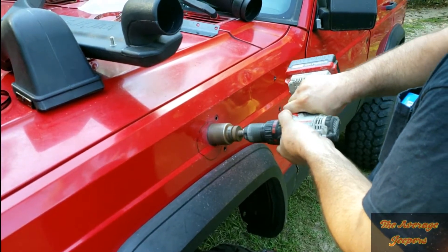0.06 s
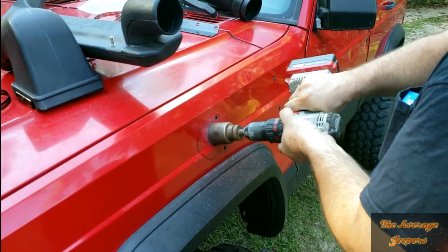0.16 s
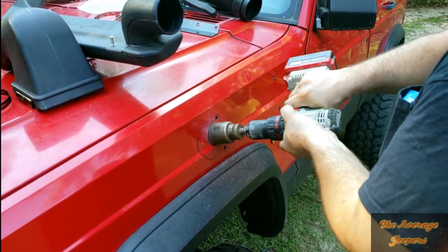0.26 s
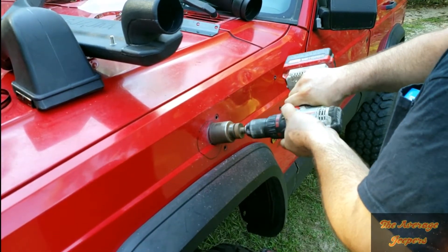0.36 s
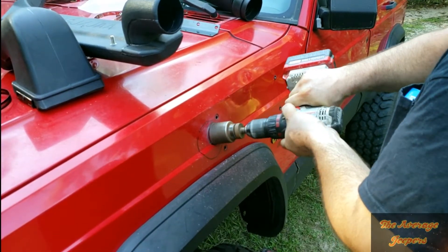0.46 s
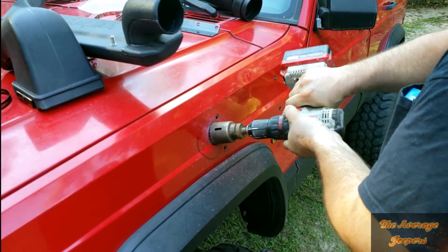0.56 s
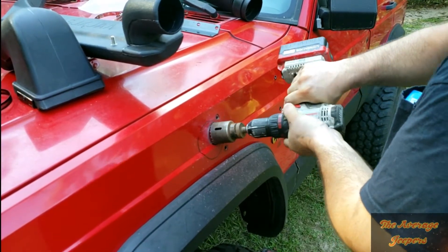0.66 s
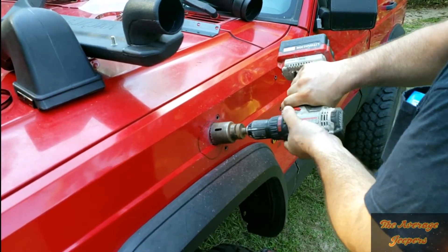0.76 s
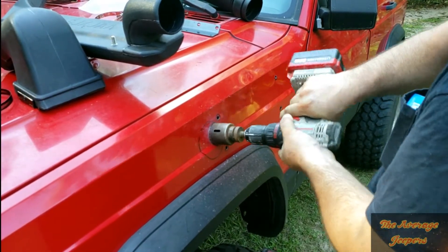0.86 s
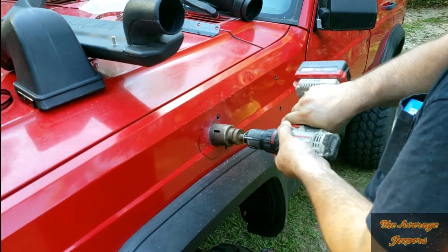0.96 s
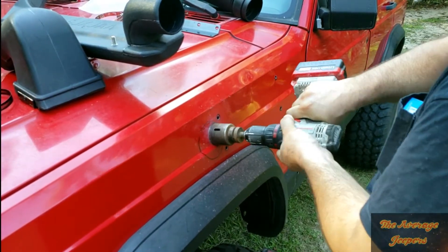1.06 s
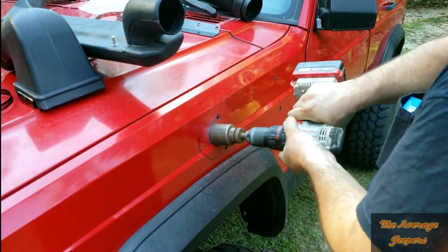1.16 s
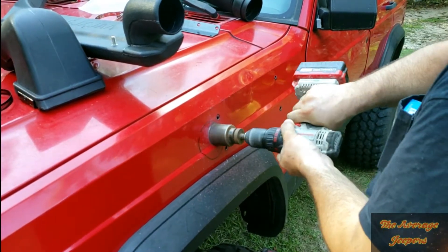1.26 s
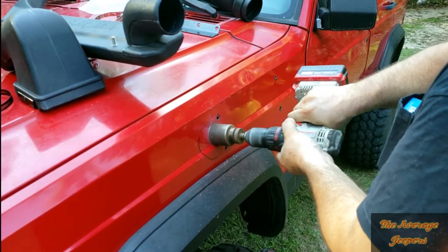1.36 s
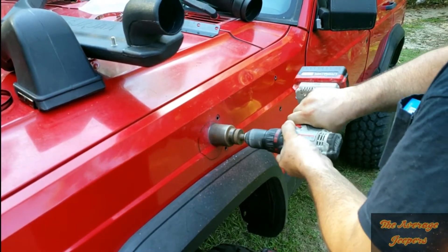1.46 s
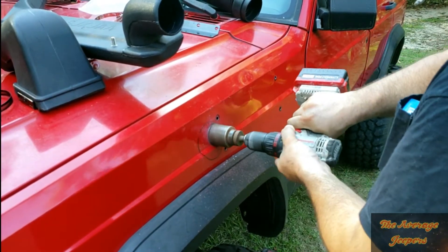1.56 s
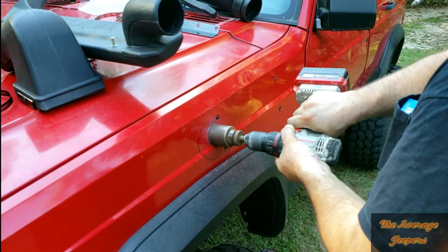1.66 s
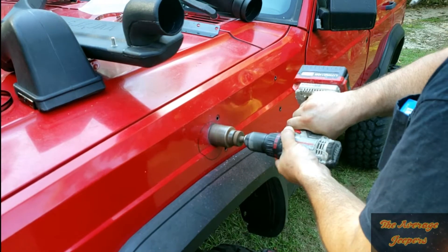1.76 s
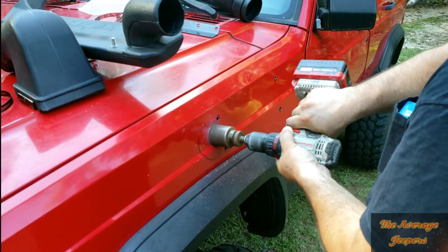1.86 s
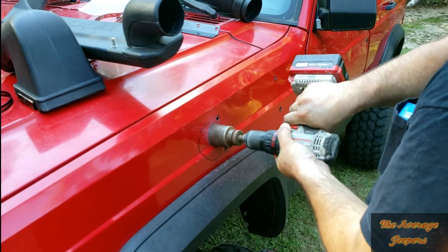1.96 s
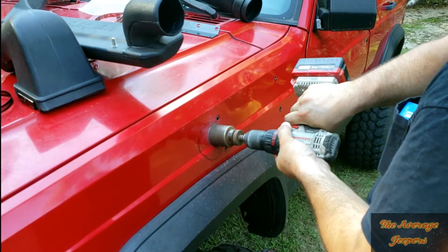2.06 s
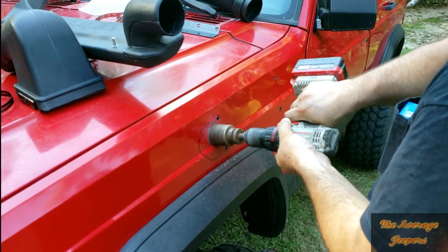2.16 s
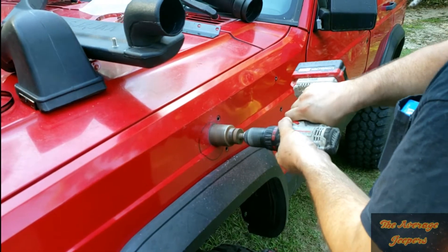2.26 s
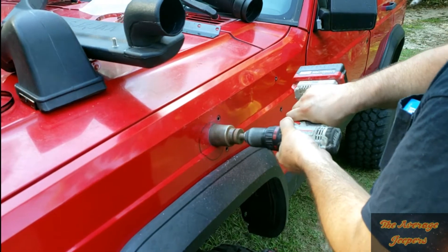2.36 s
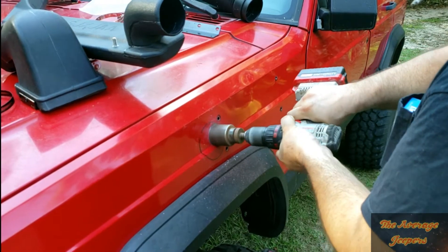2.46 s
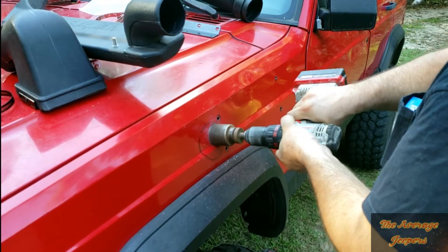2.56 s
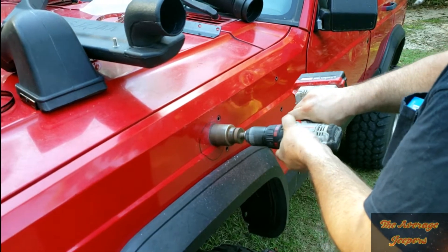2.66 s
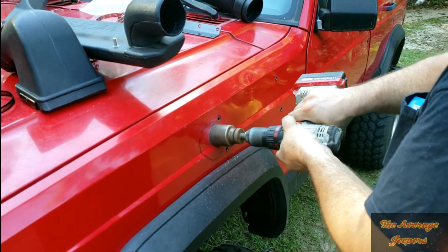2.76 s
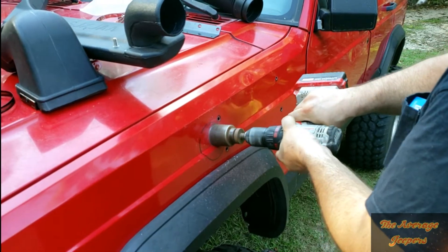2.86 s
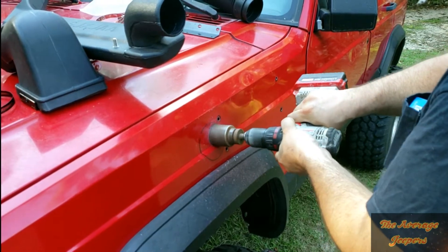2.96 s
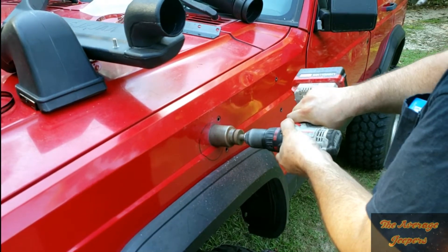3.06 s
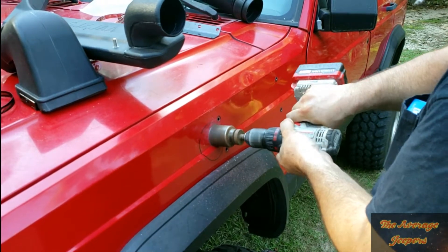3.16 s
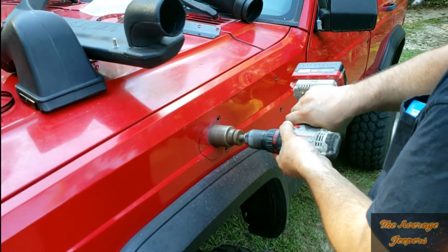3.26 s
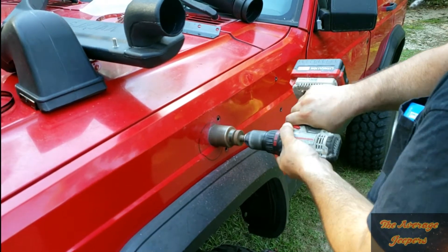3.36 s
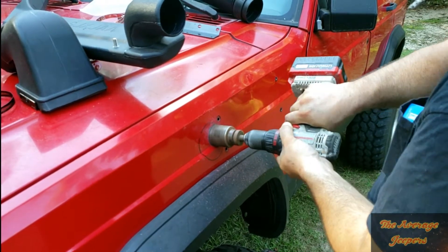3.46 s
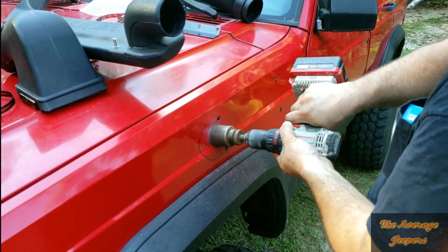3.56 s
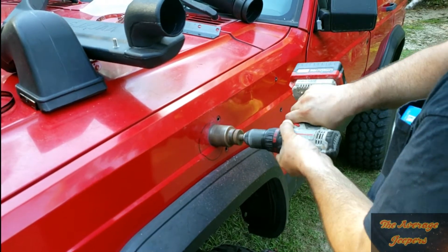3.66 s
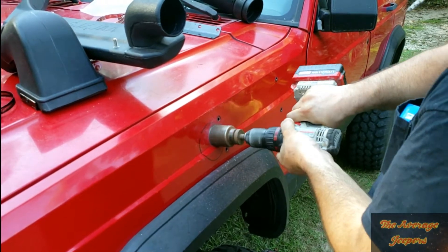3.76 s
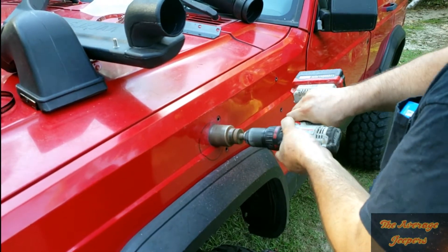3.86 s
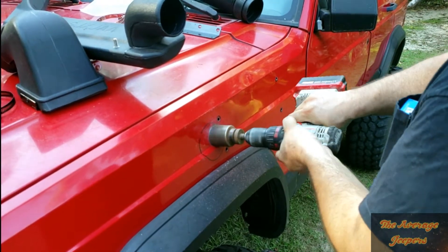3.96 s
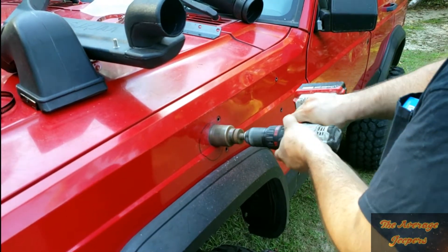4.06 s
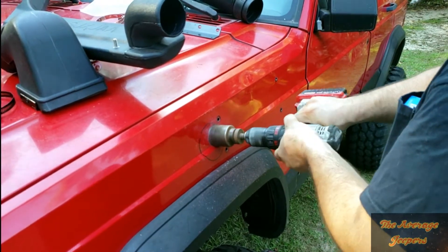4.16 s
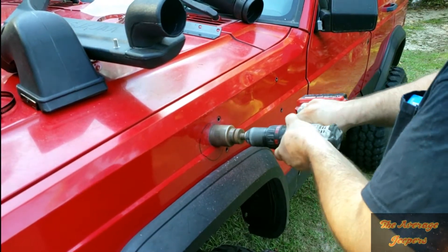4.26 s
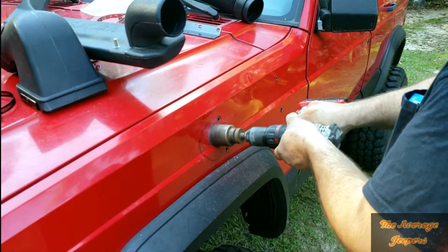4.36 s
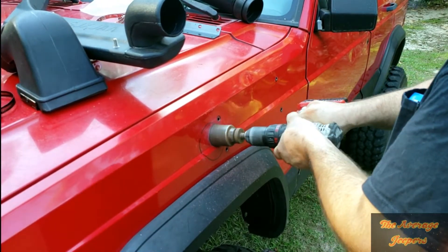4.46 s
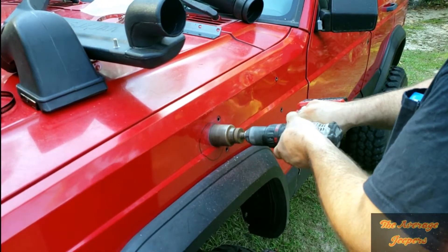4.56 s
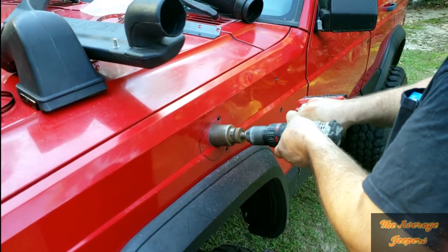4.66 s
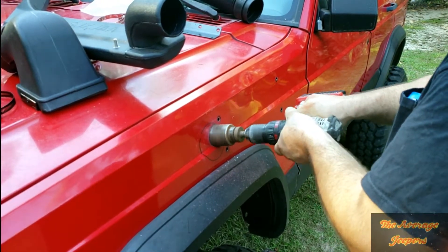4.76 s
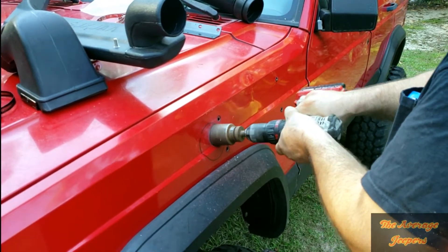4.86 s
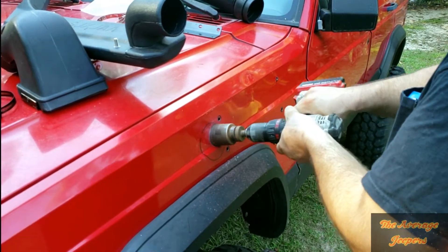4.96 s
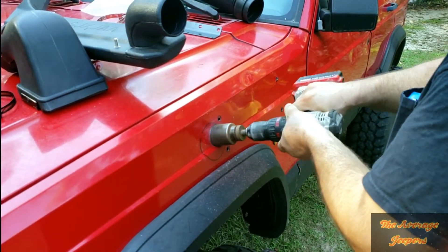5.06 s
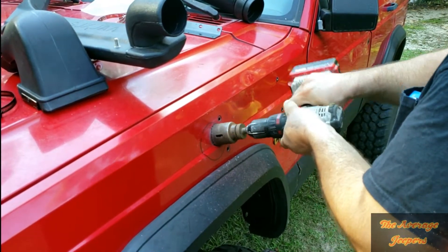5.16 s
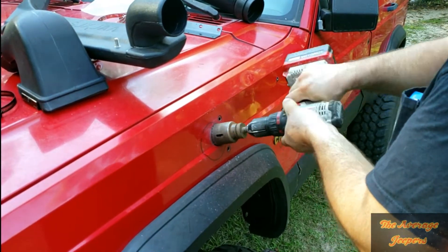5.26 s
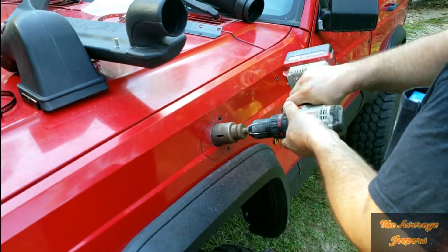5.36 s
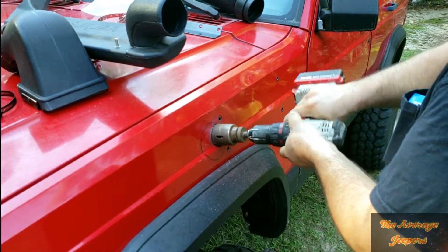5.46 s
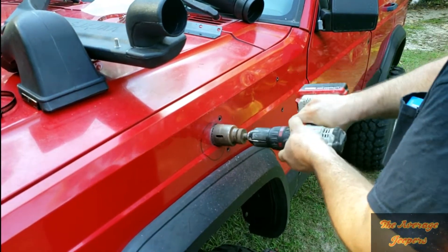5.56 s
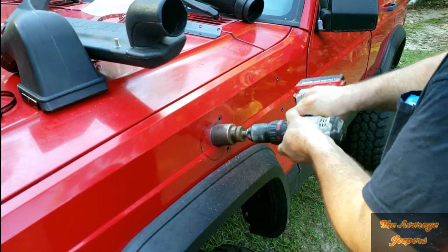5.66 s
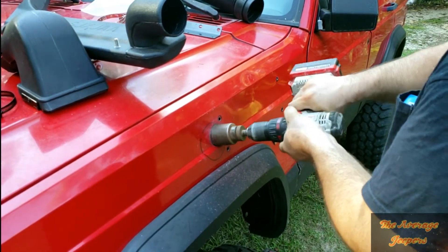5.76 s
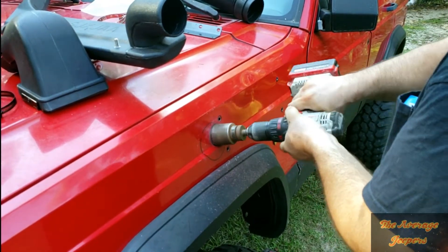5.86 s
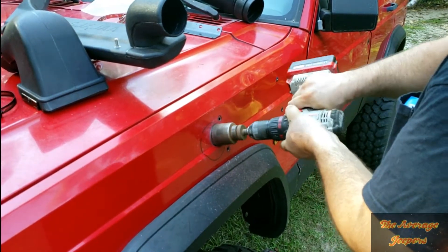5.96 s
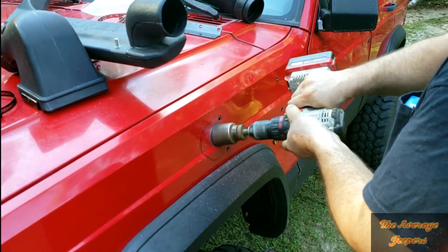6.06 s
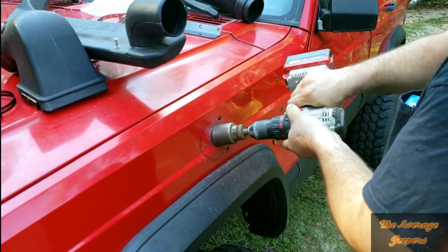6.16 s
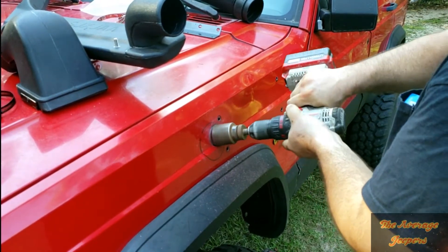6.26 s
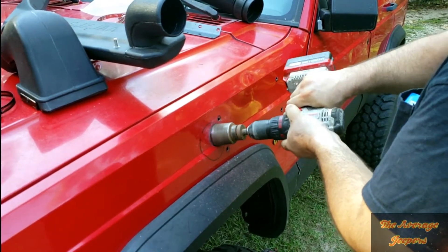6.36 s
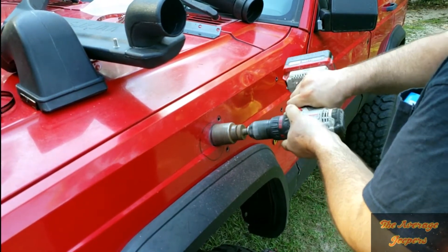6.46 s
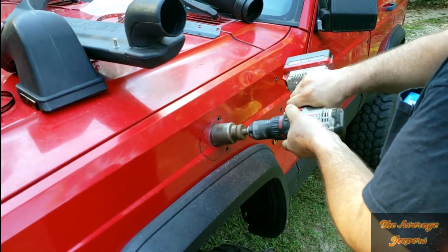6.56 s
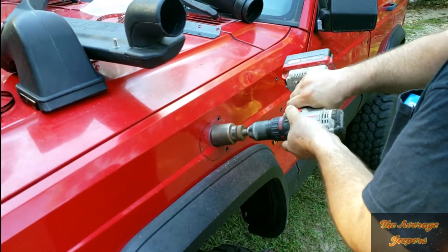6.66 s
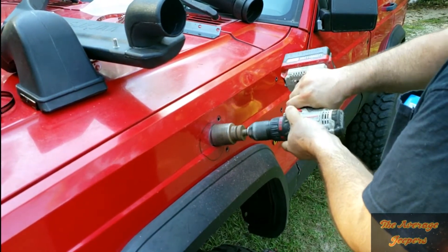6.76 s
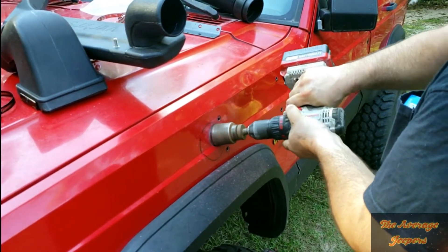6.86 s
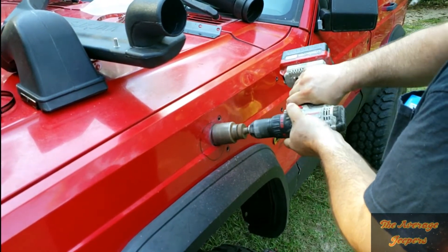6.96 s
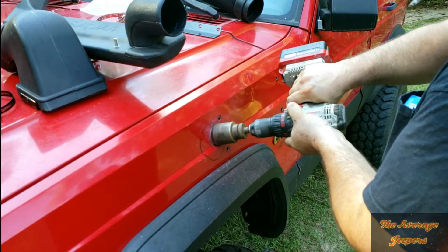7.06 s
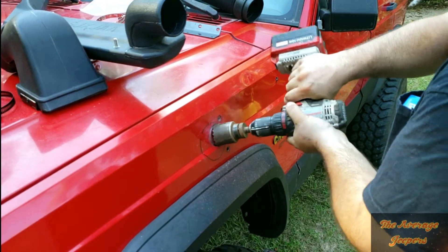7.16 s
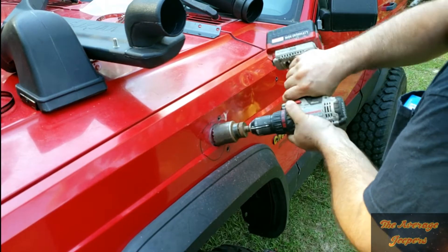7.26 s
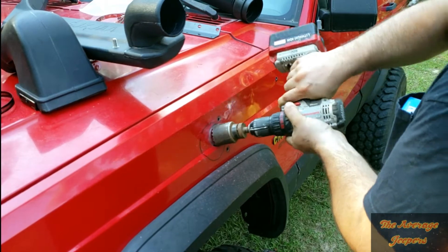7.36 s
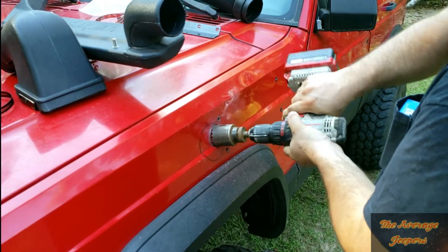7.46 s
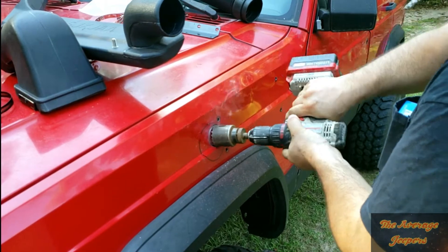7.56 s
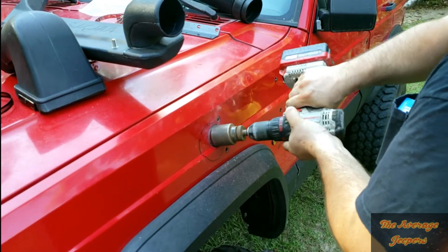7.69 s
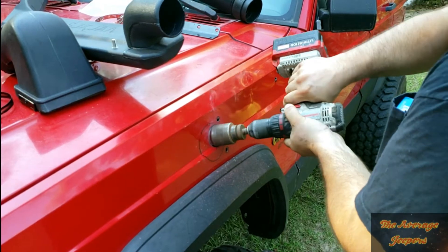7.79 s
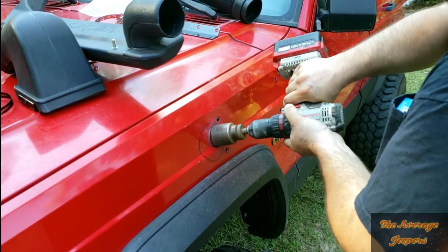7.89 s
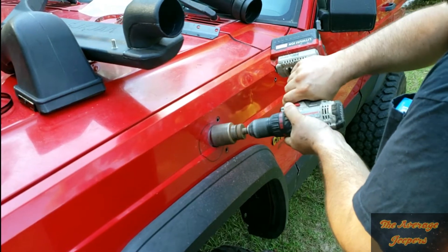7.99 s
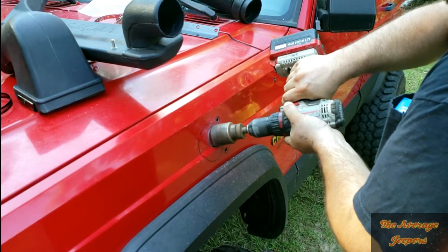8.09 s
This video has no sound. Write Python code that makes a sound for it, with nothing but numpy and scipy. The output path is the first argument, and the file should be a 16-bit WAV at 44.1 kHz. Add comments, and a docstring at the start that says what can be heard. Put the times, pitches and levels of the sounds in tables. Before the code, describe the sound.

Close stereo, outdoors, very faint background air. From 0 s a hole saw is already rasping in a steel car panel, with one piercing squeal near 10 kHz early on; it stops at 0.57 s. The stopped saw creaks with short squeaks around 0.8-0.95 s and scrapes softly, then knocks at 1.1 s. At 1.15 s the main cut bursts in, loudest early, with jolting grabs and hollow boom to about 2 s, then a steadier grinding rasp, chip hiss and beating squeals pulsing roughly 12-19 times a second. It weakens, slows and stops at 5.18 s with a last squeal. A squeak sounds near 5.45 s. From 5.66 to 7.12 s a quieter, binding run snaps and zings on burrs, especially after 6.3 s, ending in a faint squeal. Light knocks cluster around 7.4 s. At 7.69 s cutting resumes with two early snaps and continues to the end.

```python
"""Outdoors, about a metre from a car: a cordless drill runs a hole saw into its steel wing in four runs.
Random tooth forces excite the panel's modes as boom and rasp, and chips hiss above them.
Once a turn the cup rubs in its groove, driving two close modes near 10 kHz into a beating squeal.
The speed sags as the saw binds; burrs snap and zing as they catch a tooth, most of all in the third run.
Between runs the stopped saw creaks by stick and slip, knocks and scrapes, over faint outdoor noise."""
import sys
import numpy as np
from scipy import signal
from scipy.fft import rfft, irfft, next_fast_len
from scipy.io import wavfile
from scipy.ndimage import map_coordinates

SR = 44100
rng = np.random.default_rng(int(sys.argv[2]) if len(sys.argv) > 2 else 0)


def to_wav(s):
    """Save 16-bit WAV."""
    ch = np.atleast_2d(s).T  # columns
    pcm = np.round(np.clip(ch, -1, 1) * 32767)  # PCM
    wavfile.write(sys.argv[1], SR, pcm.astype(np.int16))


N = 358533
T = np.arange(N) / SR
SIZE = next_fast_len(N + SR)
FREQS = np.arange(SIZE // 2 + 1) * SR / SIZE
TOP_HZ = 15700


# how hard the saw is fed: [t/s, rasp level/dB, panel boom relative to rasp/dB], before the trims in cutting
FEED_ROWS = [(0, -36.5, -5), (.3, -40, -7), (.55, -34.5, 0), (1.15, -36, -2.5), (1.24, -25.5, -10),
             (1.62, -28, -1), (1.9, -33, -0.5), (2.35, -29.5, -10.5), (2.8, -33, -11), (3.28, -31, -5.5),
             (3.46, -34.5, -6.5), (3.65, -30.5, -11.5), (4.05, -34.5, -12.5), (4.55, -35, -10.5),
             (4.85, -39.5, -7.5), (5.179, -41, -9.5), (5.68, -37, -11), (5.85, -33.5, -7.5),
             (5.96, -42, -7.5), (6.28, -40, 1), (6.55, -40.5, -6.5), (7.12, -39.5, -1.5),
             (7.74, -31.5, 0.5), (7.84, -39, -4.5)]
# broad radiated spectra of boom, rasp and chip hiss: [f/Hz, relative level/dB]
BOOM_SPECTRUM = [(25, -24.5), (110, -19.5), (195, -15), (240, -3), (340, -2), (430, -0.5), (560, -6),
                 (900, -32), (4000, -80.5)]
RASP_SPECTRUM = [(250, -18.5), (470, -15), (560, 5), (800, 2.5), (980, -2), (1350, -1.5), (1900, -0.5),
                 (2550, 1.5), (3000, -2), (4200, -2.5), (5200, -5.5), (6300, -11.5), (7200, -9.5),
                 (16000, -32)]
HISS_SPECTRUM = [(3000, -49), (8300, -11.5), (9300, -7), (11600, -0.5), (12800, -2), (16000, -2)]
# a longer rub sheds more fine chips: base level, rise for a rub of a whole turn, dB per dB of feed
CHIPS_DB, CHIPS_RISE_DB, CHIPS_GROWTH = -14.5, 13, 0.87
# after release the rasp dies fast, the boom of the panel more slowly
RASP_FALL_DB_PER_S, BOOM_FALL_DB_PER_S = 719, 237


def cutting(modes, turns, wobble_db=0.5, flutter_db=2.2, band_swell_db=2.5, boom_db=-2.5, rasp_db=0.04):
    """Forced vibration: tooth forces make the panel boom, ring and rasp and the chips hiss."""
    times, level_db, boom_above_db = np.transpose(FEED_ROWS)
    feed_db = np.interp(T, times, level_db) + grabs()
    share = curve([(at, part) for at, _, part in LEAN_ROWS])
    rasp_gate, boom_gate = trigger(RASP_FALL_DB_PER_S), trigger(BOOM_FALL_DB_PER_S)

    # the teeth unload just after the cup has rubbed, less so when it rubs all the way round
    once_a_turn_db = -wobble_db * (2.5 - share) * np.cos(2 * np.pi * turns)
    swing = unit(undb(once_a_turn_db + flutter_db * np.tanh(walk(50))))
    force = teeth(turns, rate=1500, scatter_db=2.0, scrape_db=1.0, bite=0.22) * swing

    chips = teeth(turns, rate=7000, scatter_db=2.0, scrape_db=0, bite=.2)
    chips = chips * unit(undb(2.0 * walk(60))) * undb(CHIPS_DB + CHIPS_RISE_DB * share)
    hiss = radiate(chips * undb(CHIPS_GROWTH * feed_db) * rasp_gate, HISS_SPECTRUM)

    boom_level_db = feed_db + np.interp(T, times, boom_above_db) + boom_db
    boom = radiate(force * boom_gate * undb(boom_level_db), BOOM_SPECTRUM, modes)
    boom = boom + shifting_rings(force[1]) * boom_gate * undb(feed_db)

    rasp = radiate(force * rasp_gate * undb(feed_db + rasp_db), RASP_SPECTRUM, modes)
    rasp = flex(swelling_bands(rasp, band_swell_db), shift_s=0.0008, rate=7.2)
    return bodywork(boom, t60=0.32, wet_db=-11) + bodywork(rasp, t60=0.38, wet_db=-14.0) + hiss


def teeth(turns, rate, scatter_db, scrape_db, bite, count=24):
    """Random impulsive excitation: chips snap off over a steady scrape, most strongly as each tooth bites."""
    strength = undb(scatter_db * np.minimum(rng.exponential(size=N), 4))
    snaps = (rng.random(N) < rate / SR) * strength
    signed_snaps = unit(snaps * rng.choice([-1, 1], (2, N)))
    force = signed_snaps + undb(scrape_db) * rng.standard_normal((2, N))
    tooth_phase = 2 * np.pi * count * turns + walk(34)
    return unit(force * (1 + bite * np.cos(tooth_phase)))


# the teeth grab hard for a moment: [t/s, extra force level/dB]
GRAB_ROWS = [(1.525, 4.6), (1.637, 1.9), (1.707, 5.8), (1.768, 2.6), (1.97, 6.5), (5.755, 3.2)]
GRAB_S = 0.019


def grabs():
    """Transient loading: extra force (dB) while the teeth grab and jolt the panel."""
    extra_db = np.zeros(N)
    for s, db in GRAB_ROWS:
        i, u = arch(s - GRAB_S / 2, GRAB_S)
        extra_db[i] += db * np.sin(np.pi * u)
    return extra_db


# speed of the saw, sagging as it binds: [t/s, rotation rate/turns per s]
SPEED_ROWS = [(.55, 11.8), (1.15, 14), (1.28, 20.6), (1.87, 12.96), (2.12, 17.23), (2.52, 17.2),
              (2.95, 14.55), (3.23, 18.05), (3.36, 12.03), (3.75, 19.47), (3.89, 13.09), (4.01, 14.86),
              (4.66, 14.43), (5.12, 9.47), (5.17, 5), (5.72, 13.58), (6.22, 10.61), (6.33, 11.8),
              (6.67, 12.81), (7.07, 9.76), (7.7, 12.1)]
# each pull of the trigger: [start t/s, release t/s, time for the teeth to bite/s, moment of one rub t/s]
RUN_ROWS = [(0, 0.567, 0.0037, 0.058), (1.15, 5.178, .005, 1.544), (5.655, 7.12, 0.025, 5.716),
            (7.687, 8.2, 0.026, 8.4)]


def spindle():
    """Rotation as integrated speed: turns made in each run; the cup rubs at every whole number."""
    turned = np.cumsum(curve(SPEED_ROWS)) / SR
    turns = np.zeros(N)
    for start, _, _, rub in RUN_ROWS:
        turns = np.where(T >= start, turned - np.interp(rub, T, turned), turns)
    return turns


def trigger(fall_db_per_s):
    """Onset and exponential decay: the gain rises as the teeth bite, holds, and dies away on release."""
    gain = np.zeros(N)
    for start, stop, bite, _ in RUN_ROWS:
        rise = np.clip((T - start) / bite, 0, 1) ** 2
        gain += rise * undb(-fall_db_per_s * np.maximum(T - stop, 0))
    return gain


# steel panel and the cavity behind it, peaks and a few dips: [f/Hz, level above the broad response/dB]
PANEL_ROWS = [(240, 5), (301, 7.5), (474, -4), (660, -2), (1086, 7), (1275, 4.5), (1400, -4.5), (1570, 2),
              (1845, 7.5), (2535, 7), (3200, 6), (4230, 5.5), (6130, 9.5)]
# ring time of the first mode listed, and the power of frequency by which it shortens
PANEL_T60_S, PANEL_DAMPING = 0.18, 0.73


def panel_modes():
    """Modal superposition: a direct path plus damped resonances, the higher ones ringing shorter."""
    gain = 1
    for hz, db in PANEL_ROWS:
        t60 = PANEL_T60_S * (hz / PANEL_ROWS[0][0]) ** -PANEL_DAMPING
        detuning = (FREQS - hz) * 2 * np.pi * t60 / np.log(1000)
        gain = gain + (undb(db) - 1) / (1 + 1j * detuning)
    return gain


# resonances that shift as the saw is leaned on and the disc comes free:
# [t/s, f/Hz, level relative to the rasp/dB]
LOW_RING_ROWS = [(.5, 286, -13.5), (1.2, 384.5, -8), (1.6, 366.5, -3.5), (2.0, 357, -8), (2.6, 378.7, -14),
                 (4.5, 369, -15), (5.85, 293, -11), (7.8, 290, -16.5)]
MIDDLE_RING_ROWS = [(.5, 608, -14), (3.7, 589, -16.5), (4.55, 614, -5), (4.95, 607, -19), (7.0, 612, -11.5)]
HIGH_RING_ROWS = [(.5, 798, -11), (1.3, 707, -12), (3.651, 740, -14.5), (3.95, 788, -17), (5.1, 793, -5),
                  (5.8, 756, -14.5), (7.0, 774, -7.5)]
RING_T60_S = 0.083


def shifting_rings(force, drift_hz=9, swell_db=1.0):
    """Time-varying resonance: the teeth keep three modes ringing; each drifts and swells on its own."""
    rings = np.zeros(N)
    for rows in (LOW_RING_ROWS, MIDDLE_RING_ROWS, HIGH_RING_ROWS):
        s, hz, db = np.transpose(rows)
        pitch = np.interp(T, s, hz) + drift_hz * walk(7.5)
        level = undb(np.interp(T, s, db) + swell_db * walk(1.8))
        rings += ring(force, pitch, RING_T60_S) * level
    return filtered(rings, 1 / (1 + (FREQS / 1800) ** 4))


def ring(force, hz, t60):
    """Heterodyned one-pole resonator: a resonance whose pitch may move, scaled to rms 1."""
    spin = np.exp(2j * np.pi * np.cumsum(hz) / SR)
    pole = undb(-60 / (t60 * SR))
    return unit(np.real(spin * signal.lfilter([1], [1, -pole], force / spin)))


def flex(x, shift_s, rate):
    """Frequency modulation by varying delay: the panel bends under the saw, so its ringing wavers."""
    at = np.arange(N) + shift_s * SR * walk(rate)
    return np.array([map_coordinates(side, [at], order=3) for side in x])


def swelling_bands(x, spread_db, count=14):
    """Independent band modulation: bands of the rasp swell and fade at random, each on its own."""
    place = np.interp(np.log(FREQS + 1), np.log([500, 6000]), [0, count - 1])
    spectrum = rfft(x, SIZE)
    total = np.zeros((2, N))
    for k in range(count):
        band = irfft(spectrum * np.maximum(0, 1 - np.abs(place - k)), SIZE)[:, :N]
        total += band * unit(undb(spread_db * walk(39)))
    return total


# how the cup leans on its groove: [t/s, squeal force level/dB, share of each turn that it rubs]
LEAN_ROWS = [(0.121, -18.5, 0.38), (.24, -69, 0.39), (1.39, -35, 0.27), (1.492, -13.5, 0.34),
             (1.871, -15, 0.31), (2.051, -23.5, 0.4), (2.35, -18.5, 0.56), (2.55, -23.5, 0.91),
             (3.2, -21.5, 0.98), (3.4, -23, 0.61), (3.8, -19, 0.92), (3.9, -19, 0.63), (4.6, -23.5, 0.6),
             (5.05, -25.5, 0.41), (5.86, -28.5, 0.53), (5.96, -41.5, 0.4), (6.22, -53.5, .35),
             (6.56, -37.5, 0.29), (6.78, -28, 0.33), (6.95, -45, 0.39), (7.72, -41, 0.39),
             (7.8, -36.5, 0.64)]
# the cup squeals again as the saw slows to a stop: [t/s, force level/dB]
LAST_SQUEAL_ROWS = [(5.147, -30.5), (7.065, -37.5), (7.119, -30)]
# broad noise around the squeal: [f/Hz, relative level/dB]
SKIRT_SPECTRUM = [(7500, -43.5), (9400, -9.0), (10100, -9.5), (10800, -9), (16000, -43.5)]
# the squeal is lower the faster the saw turns: pitch at rest, drop per turn a second
CUP_HZ, CUP_DROP_HZ = 10513, 49.1


def squeals(turns,
            split_hz=400, chatter_db=0.5, skip_db=-14,  # for a rub of a whole turn; scaled by its share
            glide_hz=30, jitter_hz=60, rough_db=4.5, skirt_db=-18, level_db=-0.45,
            swell=0.3, grip=0.52, grip_delay=0.36, fade_db=3):  # shape of one rub
    """Friction-driven modes: each rub excites a close, beating pair, the lower where the rub is firmest."""
    times, lean_db, shares = np.transpose(LEAN_ROWS)
    speed, share_now = curve(SPEED_ROWS), np.interp(T, times, shares)
    lengths = share_now / speed
    rubs = []
    for start, stop, _, _ in RUN_ROWS:
        rubs += [(s, np.interp(s, times, lean_db)) for s in passes(turns, start, stop)]

    lower, upper, bend = np.zeros((3, N))
    for s, db in rubs + list(LAST_SQUEAL_ROWS):
        length, share = np.interp(s, T, lengths), np.interp(s, times, shares)
        i, u = arch(s - .35 * length, length)
        # the rub grips quickly and lets go slowly; a long one holds its force but skips once past the middle
        skip = np.exp(-((u - .58) / 0.029) ** 2)
        shape = np.abs(np.sin(np.pi * u ** (grip + grip_delay * share))) ** (swell / share)
        rub = undb(db + skip_db * share * skip - fade_db * (u - .5)) * shape
        firm = np.exp(-((u - .35) / 0.25) ** 2)
        lower[i] += rub * np.sqrt(firm)
        upper[i] += rub * np.sqrt(1 - firm)
        bend[i] = u - .5

    hz = CUP_HZ - CUP_DROP_HZ * speed + glide_hz * bend
    # a light, brief rub hardly pulls the two modes apart
    split = split_hz * share_now
    # long rubs break up into chatter
    chatter = unit(undb(chatter_db * share_now * np.tanh(walk(90))))
    tones = np.zeros((2, N))
    for drive, offset in ((lower, -split / 2), (upper, split / 2)):
        phase = 2 * np.pi * np.cumsum(hz + offset + jitter_hz * walk(255)) / SR
        drive = drive * chatter * unit(undb(rough_db * np.tanh(walk(460))))
        # phase and level wander at random between the two microphones
        lag, lean = 1.0 + 0.24 * walk(37), undb(0.65 * walk(25))
        tones += np.sqrt(2) * drive * np.array([np.sin(phase + lag) * lean, np.sin(phase - lag) / lean])
    skirt = filtered(rng.standard_normal((2, N)) * (lower + upper), colour(SKIRT_SPECTRUM))
    return bodywork(undb(level_db) * (tones + undb(skirt_db) * skirt), t60=0.26, wet_db=-16.0)


def passes(turns, start, stop):
    """Periodic contact: moments between start and stop at which a turn is completed."""
    times = T[1:][np.diff(np.floor(turns)) == 1]
    return times[(times > start) & (times < stop)]


# a burr in the cut catches a tooth: [t/s, snap force level/dB, zing relative to the snap/dB]
BURR_ROWS = [(1.224, -22.5, -14), (1.282, -26.5, -10), (5.975, -32.5, -6), (6.145, -39, 2),
             (6.329, -29, -2), (6.409, -25, -3), (6.495, -26.5, -10), (6.576, -25, -1), (6.654, -25.5, -9),
             (6.73, -30.5, -3), (6.817, -31, 7), (6.905, -23, -3), (7.718, -31, -14), (7.762, -29, -1)]
# broad spectrum of the snap: [f/Hz, relative level/dB]
BURR_SPECTRUM = [(100, -9), (300, 5), (1500, -17.5), (8000, -5.5), (12500, 3.5), (15000, -4.5)]


def catches(start_hz=15800, fall_hz=2600, tear_share=0.61, length=.015):
    """Friction, then fracture: a tooth drags along a burr with a falling zing and a ragged snap."""
    tear, sing, hz = np.zeros(N), np.zeros(N), np.full(N, 1. * start_hz)
    for s, db, zing_db in BURR_ROWS:
        i, u = arch(s - tear_share * length, length)
        tear[i] += undb(db) * np.interp(u, [0, tear_share, 1], [0, 1, 0]) ** 1.3
        sing[i] += undb(db + zing_db) * np.sin(np.pi * u) ** 2
        hz[i] -= fall_hz * u
    ragged = unit(undb(2.5 * walk(700)))
    zing = sing * np.sin(2 * np.pi * np.cumsum(hz + 350 * walk(820)) / SR)
    snap = radiate(tear * ragged * rng.standard_normal((2, N)), BURR_SPECTRUM)
    left_right = undb([[3.5], [-.5]])
    return bodywork((snap + zing * ragged) * left_right, t60=0.034, wet_db=-12.5)


# the stopped saw sticks and slips in the groove:
# [start t/s, length/s, level/dB, f/Hz, overtone slope/dB per octave, fall in pitch/Hz]
CREAK_ROWS = [(0.806, 0.066, -33, 1940, -13, 94), (0.857, 0.033, -40, 1914, -15, 40),
              (0.88, 0.036, -44, 1960, -24, 60), (0.913, 0.027, -42, 1920, -26, 0),
              (5.351, 0.032, -67, 3690, -5.5, 0), (5.437, 0.047, -36, 2035, -7.5, -5),
              (5.469, 0.054, -53, 2080, -11, 5)]


def creaks(jitter_hz=26, rough_db=3.0, scuff_db=-11, count=7):
    """Stick-slip oscillation: regular slips give a short squeak with a stack of overtones."""
    squeaks, waver = np.zeros(N), jitter_hz * walk(400)
    orders = np.arange(1, count + 1)[:, None]
    for s, length, db, hz, slope_db, fall_hz in CREAK_ROWS:
        i, u = arch(s, length)
        phase = 2 * np.pi * np.cumsum(hz - fall_hz * (u - .5) + waver[i]) / SR
        # the overtones grow as the slip gathers force
        force = np.sin(np.pi * u)
        overtones = undb(slope_db * np.log2(orders)) * (orders * hz < TOP_HZ) * force ** np.log2(orders)
        squeaks[i] += undb(db) * force * unit(np.sum(overtones * np.sin(orders * phase), axis=0))
    # uneven slips spread a scuffing skirt around each overtone
    squeaks = squeaks * (unit(undb(rough_db * walk(150))) + undb(scuff_db) * walk(370))
    return bodywork(squeaks * undb([[1.5], [-1.5]]), t60=.12, wet_db=-13)


# the saw knocks or shifts against the panel: [t/s, force level/dB, 60 dB decay time/s, treble/dB]
KNOCK_ROWS = [(1.103, -49, 0.2, -20), (5.597, -54, 0.39, -23), (5.652, -52, 0.11, 2),
              (7.197, -53, 0.13, -5), (7.224, -62.5, 0.026, 7), (7.354, -63, .09, 0),
              (7.392, -39, 0.054, 6), (7.408, -43.5, .13, -1.5), (7.433, -47, 0.14, -9),
              (7.508, -56.5, 0.13, -3)]
# the stopped teeth drag along the groove: [start t/s, strongest t/s, end t/s, force level/dB, treble/dB]
# an end before the strongest moment cuts the scrape off there; an end before the start leaves it silent
SCRAPE_ROWS = [(0.757, 0.857, 0.84, -52.5, 0), (0.854, 0.925, 1.005, -52, -5),
               (0.965, 1.125, 1.16, -63, -2.5), (5.248, 5.267, 5.07, -64, 0.5),
               (5.372, 5.378, 6.14, -64, -1.5), (5.437, 5.474, 5.49, -52, 7)]
# broad spectrum of these contacts: [f/Hz, relative level/dB]
KNOCK_SPECTRUM = [(60, -16), (300, 1), (1300, -7.5), (3300, -10), (4000, -11.5), (5000, -18),
                  (15000, -21.5)]


def contacts(modes, soft_hz=900, ping_hz=4050, ping_db=-2, ping_t60=0.014):
    """Impact and sliding excitation: knocks die away, scrapes swell and fade, each with its own treble."""
    thud, bright, ping = np.zeros((3, N))
    for s, db, t60, treble_db in KNOCK_ROWS:
        i, u = arch(s, t60)
        thud[i] += undb(db - 60 * u)
        bright[i] += undb(db + treble_db - 60 * u)
        ping[i] += undb(db + treble_db - 60 * u * t60 / ping_t60)
    for start, strongest, end, db, treble_db in SCRAPE_ROWS:
        drag = undb(db) * np.interp(T, [start, strongest, end], [0, 1, 0]) ** 0.98
        thud += drag
        bright += drag * undb(treble_db)
    rattle = rng.standard_normal((2, N)) * undb(2.0 * walk(200))
    low_pass = 1 / (1 + (FREQS / soft_hz) ** 4)
    force = filtered(rattle * thud, low_pass) + filtered(rattle * bright, 1 - low_pass)
    # a hard contact also rings the cup briefly
    cup = undb(ping_db) * ping * np.sin(2 * np.pi * ping_hz * T)
    return radiate(force, KNOCK_SPECTRUM, modes) + cup


# spectrum of the outdoor background: [f/Hz, relative level/dB]
AIR_SPECTRUM = [(25, -7), (300, -10), (700, -3.5), (1400, -21.5), (5000, -29), (16000, -31.5)]
AIR_DB = -71.5


def air():
    """Ambient noise: a faint outdoor background of shaped, slowly swelling random pressure."""
    return radiate(rng.standard_normal((2, N)) * undb(AIR_DB + 1.4 * walk(5.3)), AIR_SPECTRUM)


# how much the two microphones differ: [f/Hz, side minus mid level/dB] and [f/Hz, left minus right level/dB]
WIDTH_ROWS = [(60, -7.5), (200, -24.5), (600, -11.5), (1300, -4), (4400, -1.5), (8000, 0.5)]
BALANCE_ROWS = [(100, 0.75), (380, 0.58), (2400, 2.2), (8000, 0.2)]


def radiate(force, points, modes=1):
    """Mid-side radiation of two forces: the microphones share or differ by frequency."""
    gain = colour(points) * modes
    width = response(WIDTH_ROWS)
    gain = gain / np.sqrt(np.mean(np.abs(gain) ** 2) * (1 + width ** 2))
    mid = rfft(force[0], SIZE) * gain
    side = rfft(force[1], SIZE) * gain * width
    lean = np.sqrt(response(BALANCE_ROWS))
    return irfft(np.array([(mid + side) * lean, (mid - side) / lean]), SIZE)[:, :N]


def bodywork(x, t60, wet_db):
    """Diffuse reflection: dense, decaying echoes off the car, different at each microphone."""
    t = T[:SR // 2]
    tails = rng.standard_normal((2, len(t))) * undb(-60 * t / t60)
    tails /= np.sqrt(np.sum(tails ** 2, axis=1, keepdims=True))
    return x + undb(wet_db) * filtered(x, rfft(tails, SIZE))


def undb(db):
    """Level to amplitude ratio: decibels to gain."""
    return 10 ** (np.asarray(db) / 20)


def unit(x):
    """Power normalisation: scale to rms 1."""
    return x / np.sqrt(np.mean(x ** 2))


def curve(rows):
    """Linear interpolation: rows (t/s, value) joined by straight lines."""
    return np.interp(T, *np.transpose(rows))


def response(points):
    """Frequency response: gain at every frequency, interpolated in dB over log f."""
    hz, db = np.transpose(points)
    return undb(np.interp(np.log(FREQS + 1), np.log(hz), db))


def filtered(x, gain):
    """Linear filtering: multiply the spectrum by a frequency response."""
    return irfft(rfft(x, SIZE) * gain, SIZE)[..., :N]


def colour(points):
    """Minimum phase by folding the cepstrum: a causal response of unit power through the points."""
    cepstrum = irfft(np.log(unit(response(points))), SIZE)
    cepstrum[1:SIZE // 2] *= 2
    cepstrum[SIZE // 2 + 1:] = 0
    return np.exp(rfft(cepstrum))


def walk(rate):
    """Low-passed noise: smooth chance of rms 1 that changes about rate times a second."""
    return unit(filtered(rng.standard_normal(N), np.exp(-(FREQS / rate) ** 2)))


def arch(start, length):
    """Event time base: sample indices of a short event and its progress from 0 to 1."""
    i = np.arange(max(int(start * SR), 0), min(int((start + length) * SR), N))
    return i, np.clip((i / SR - start) / length, 0, 1)


def scene():
    """Superposition: the saw on the panel, in open air."""
    modes, turns = panel_modes(), spindle()
    return cutting(modes, turns) + squeals(turns) + catches() + creaks() + contacts(modes) + air()


def record(dry):
    """Band limitation: a steep elliptic low-pass removes the top of the spectrum."""
    return signal.sosfilt(signal.ellip(10, .2, 70, TOP_HZ, fs=SR, output="sos"), dry)


dry = scene()
out = record(dry)
to_wav(out)
```